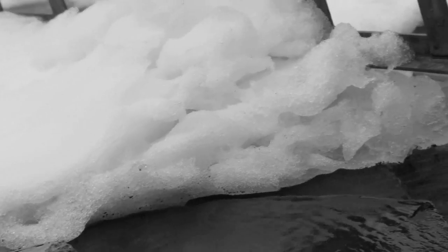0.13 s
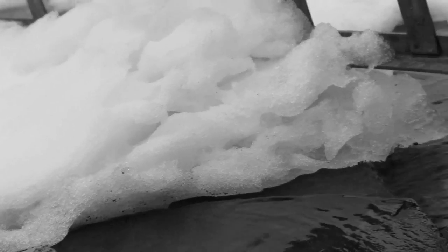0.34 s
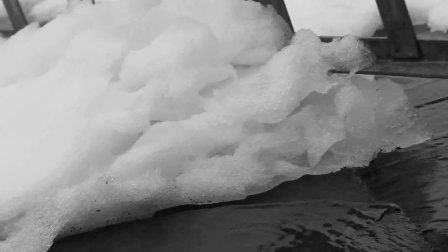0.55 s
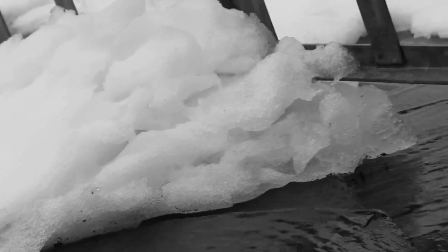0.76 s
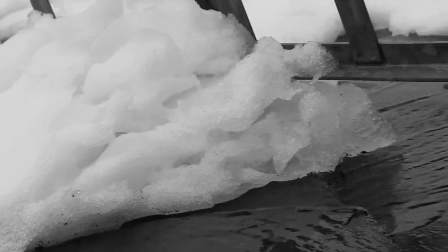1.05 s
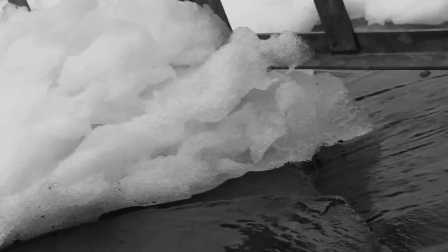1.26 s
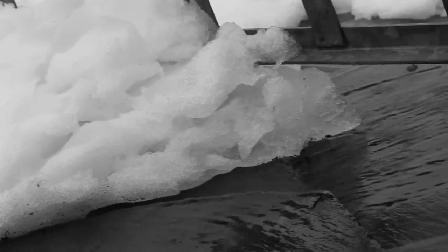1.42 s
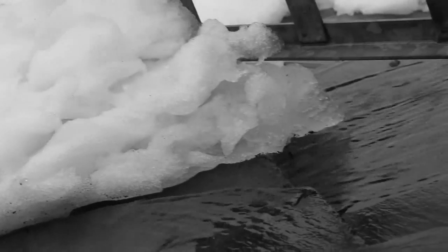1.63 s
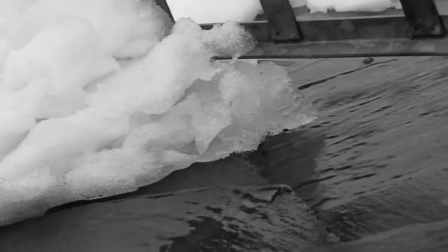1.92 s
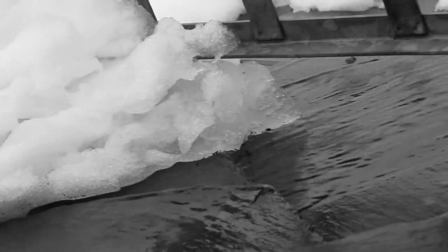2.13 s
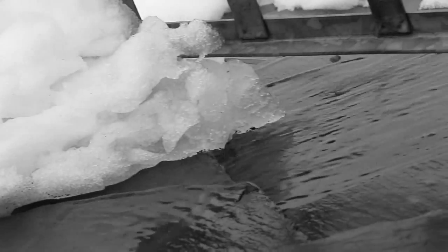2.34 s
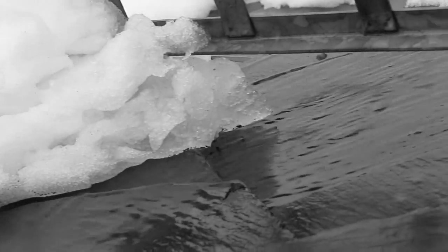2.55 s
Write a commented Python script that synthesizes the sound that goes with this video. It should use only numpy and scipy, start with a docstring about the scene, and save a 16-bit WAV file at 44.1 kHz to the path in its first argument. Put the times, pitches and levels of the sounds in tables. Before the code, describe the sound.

Close, uneven water drips splat and plink on wet wood over a soft distant trickle

```python
"""Meltwater drips from a bank of thawing snow onto wet wooden boards, close to the microphone.
Drops splat as a dead thud, a slap and a puff of spray, or trap a bubble that rings briefly.
Tiny ringing droplets and dry ticks of spatter, placed by chance, fill the gaps.
Diffuse noise tails scatter the water off boards, railing and yard; far off, shaped noise makes
the trickle, faint wind and hiss, and a wavering sine makes a low hum."""
import sys
import numpy as np
from scipy import signal
from scipy.fft import rfft, irfft
from scipy.io import wavfile
from scipy.ndimage import uniform_filter1d

SR = 44100
rng = np.random.default_rng(int(sys.argv[2]) if len(sys.argv) > 2 else 0)


def output_pcm(signal):
    """Save a mono or channel-first signal as 16-bit PCM at the path in sys.argv[1].

    Samples are clipped to [-1, 1] before scaling.
    """
    pcm = np.clip(np.atleast_2d(signal).T, -1, 1) * 32767
    wavfile.write(sys.argv[1], SR, np.round(pcm).astype(np.int16))


N = 118629
T = np.arange(N) / SR
GRAIN_T = np.arange(1600) / SR  # the longest single drop sound
FREQ = np.maximum(np.arange(N // 2 + 1) * SR / N, 1)

# Levels are before reflections and the recorder; pan_db is left minus right.
# Near bubbles that ring: start_s, pitch_hz, peak_db, swell_s, decay_s (time constant), pan_db
RINGING_BUBBLES = [(.1555, 1340, -26.5, .002, .005, -4), (.4, 2400, -31, .001, .003, -2),
                   (.4155, 1890, -29, .004, .005, -1), (.4715, 2080, -20.5, .001, .004, -2),
                   (.4745, 1800, -22, .002, .0025, -1), (.8478, 1770, -23, .0025, .004, -3),
                   (1.077, 3220, -35, .001, .003, -2), (1.1075, 1030, -20, .003, .0038, -1),
                   (1.5325, 1780, -33, .0015, .004, -2), (1.599, 2190, -32, .002, .004, -1),
                   (1.826, 690, -31, .003, .004, 1), (2.111, 1010, -34, .002, .006, -1),
                   (2.2063, 2400, -20.5, .0007, .0024, -1), (2.2105, 3100, -32, .001, .003, -1),
                   (2.2345, 1310, -27.5, .003, .006, -3), (2.249, 1600, -35, .002, .004, -2),
                   (2.3805, 990, -23, .0035, .004, -1), (2.4985, 2500, -34, .001, .003, 0),
                   (2.5677, 1620, -17.5, .0023, .0023, -3), (2.577, 1640, -29, .0015, .002, 0),
                   (1.322, 2400, -36, .002, .003, -1), (.188, 5250, -37, .001, .002, 3),
                   (.348, 6630, -33, .001, .0015, 0), (.36, 4740, -38, .001, .002, 4),
                   (.48, 6350, -30, .001, .0015, -3), (.657, 7080, -32, .001, .0015, -2),
                   (.9203, 5530, -28.5, .0008, .0016, 0), (1, 5490, -32, .001, .0012, 3),
                   (1.078, 6740, -33, .001, .0015, -2), (1.194, 5120, -38, .001, .002, 2),
                   (1.295, 7240, -29, .001, .0015, -3), (1.5335, 4970, -22, .001, .0008, 0),
                   (1.6235, 4420, -29, .0015, .002, 4), (1.956, 5990, -38, .001, .003, 0),
                   (1.979, 6960, -31, .001, .002, -3), (2.057, 5700, -31, .001, .0015, 3),
                   (2.096, 5280, -34, .001, .002, 3), (2.197, 6310, -32, .001, .002, -4),
                   (2.36, 9780, -35, .0005, .0007, 0), (2.4108, 4800, -29, .0008, .0015, -1),
                   (2.537, 4870, -38, .001, .002, -3), (2.598, 6650, -37, .001, .002, 1),
                   (2.658, 6800, -35, .001, .0025, -1), (1.912, 3700, -39, .001, .003, -1)]
# Near drops striking the boards, levels before each part decays (slap and spray as rms):
# start_s, thud_hz, thud_db, slap_db, spray_db, spray_centre_hz, pan_db
BOARD_SPLATS = [(.1558, 1500, -26, -37, -43, 7000, -4), (.2243, 800, -27, -36, -41, 10000, -7),
                (.399, 1500, -28, -46, -44, 6000, -2), (.4715, 1400, -25, -32, -44, 8500, -2),
                (.7842, 850, -13, -29, -27, 7000, -5), (.7852, 2100, -13, -28, -42, 2600, 0),
                (.8472, 1000, -24, -41, -41, 7000, -3), (.949, 1900, -27, -35, -39, 6000, -2),
                (.9535, 1000, -33, -44, -36, 8000, -4), (1.078, 1000, -31, -46, -44, 8000, -2),
                (1.1063, 900, -19, -44, -42, 7500, -2), (1.1066, 1900, -17, -40, -52, 2400, -1),
                (1.3595, 1400, -22, -33, -38, 4000, -5), (1.5003, 1600, -26, -31, -42, 5000, -5),
                (1.5327, 1500, -30, -31, -31.5, 5000, 0), (1.576, 1450, -22.5, -29, -39, 4200, -5),
                (1.599, 1100, -30, -38, -48, 4000, -3), (1.6232, 2200, -38, -46, -33.5, 7000, 3),
                (1.6272, 1400, -21, -31, -32, 4600, -7), (1.7355, 1700, -33, -36, -36, 3700, 0),
                (1.828, 1200, -27, -41, -48, 5000, 0), (1.979, 1500, -38, -48, -36, 11000, -3),
                (2.2066, 1600, -23, -33, -35, 8000, -1), (2.234, 1300, -27, -41, -53, 6000, -3),
                (2.2805, 1500, -24, -41, -36, 5400, -1), (2.379, 1250, -21, -41, -47, 8000, -2),
                (2.4105, 2000, -44, -48, -39, 6000, -1), (2.36, 2000, -46, -50, -39, 9000, 0),
                (2.4455, 2000, -42, -48, -40, 7000, 0), (2.4985, 2000, -37, -41, -41, 4500, 0),
                (2.568, 900, -26, -47, -53, 7000, -3), (.0635, 2000, -44, -48, -39, 12000, -1),
                (.5845, 2000, -44, -48, -40, 12000, 0), (1.2635, 2000, -44, -48, -37, 12000, 1)]
# Unseen droplets in the snow, by size class:
# rate_per_s, lowest_hz, highest_hz, ring_cycles (scaled by chance), size_spread_db, rms_db
SNOW_DROPLETS = [(90, 4300, 8000, 6., 4., -59.5), (200, 7500, 13000, 4., 3.8, -65),
                 (150, 1100, 3500, 3., 2.6, -53.5), (110, 450, 1400, 3., 2.2, -51.5)]
# Relative spectrum of the moving air, low wind and breeze: frequency_hz, level_db (per Hz)
AIR_SPECTRUM = [(13, -16), (24, 0), (40, -5), (58, 0), (75, -4), (100, -6), (140, -7.5), (200, -9.5),
                (255, -10), (305, -7), (345, -11), (385, -10), (450, -16), (580, -30)]
# Relative spectrum of far water and hiss: frequency_hz, level_db (per Hz)
FAR_WATER_SPECTRUM = [(400, 1), (470, 0), (530, 6.5), (600, .5), (800, .5), (1020, 1.5), (1200, -3.5),
                      (1500, 0), (1700, -7.5), (2000, -8.5), (2300, -9.5), (3000, -14.5), (3700, -16.5),
                      (5000, -17.5), (7000, -19.5), (8500, -24), (9500, -23.5), (9950, -18.5),
                      (10500, -23.5), (12500, -23), (14000, -32), (15000, -52)]
# Stereo width of the background: frequency_hz, side_against_mid_db
STEREO_WIDTH = [(28, 9), (60, 3.5), (105, -2), (200, -2), (370, 5), (690, -1), (1270, -6), (2400, -3),
                (4500, -4.5), (8000, -1), (14000, 1)]
# Changes of the low wind: time_s, change_db
WIND_GUSTS = [(0, 0), (.5, 0), (.7, .7), (.9, 0), (1.07, 1.2), (1.3, -1.5), (1.7, -2), (2.69, -.5)]
# Changes of the breeze: time_s, change_db
BREEZE_EASING = [(0, 3), (.5, 2.5), (1, .5), (1.5, 0), (2, -3), (2.69, -2.5)]
# Swells of the far trickle: time_s, change_db
TRICKLE_SWELLS = [(0, 2.5), (.42, 2.3), (.6, -.7), (1.1, -.3), (1.5, .1), (2, -2), (2.69, -3)]
# Distant hum coming and going: time_s, level_db
HUM_LEVELS = [(0, -48), (.24, -36), (.5, -41), (.95, -48), (1.1, -43), (1.3, -46), (1.55, -32), (1.65, -45),
              (1.72, -39), (1.98, -54), (2.25, -41), (2.55, -34), (2.69, -41)]
# Narrow gaps in the recorder's response: centre_hz, width_hz
RECORDER_NOTCHES = [(3940, 280), (7880, 260)]

LAG_S_PER_DB = .000012  # each side's time shift per dB of pan
WIND_DB, BREEZE_DB, FAR_WATER_DB = -33.5, -37.8, -41.7  # before their slow changes
MURMUR_TOP_HZ = 2700  # the far water swells below this; the hiss above does not
HUM_HZ, HUM_WIDTH_HZ, HUM_SIDE = 99.5, 7., .45  # HUM_SIDE is a gain
BUBBLE_RISE_PER_S = 2.  # share of the pitch gained per second
BUBBLE_WOBBLE, WOBBLE_S = .07, .0016  # spread as a share of pitch; time between changes
SPATTER_PER_S, SPATTER_SPREAD_DB, SPATTER_DB = 45, 4., -61.5
THUD_CYCLES = 1.1  # decay time constant in cycles of the thud
SLAP_HZ, SLAP_S = (1600, 2900), .0019  # band of the slapped water film, decay
SPRAY_S, SPRAY_WIDTH = .002, .8  # decay; bandwidth as a share of the centre
THROWN_S, THROWN_HZ = .022, (4500, 11000)  # longest flight, pitch range
THROWN_DB, THROWN_RING_S = -2, .0006  # upper level against the spray, ring decay
SCATTER_T60_S, SCATTER_DB = .035, -10.5  # boards and railing close by
YARD_T60_S, YARD_DB = .25, -19  # the yard further off
TREBLE_HZ, TOP_HZ = 13500, 14800  # the microphone dulls; the recorder cuts


def undb(db):
    """Decibels to gain."""
    return 10 ** (np.asarray(db) / 20)


def level(x, db):
    """Scale to an rms level."""
    return x * undb(db) / np.sqrt(np.mean(x ** 2))


def over_hz(points):
    """Gain at every frequency, from points joined along a log-frequency line."""
    hz, db = np.array(points).T
    return undb(np.interp(np.log(FREQ), np.log(hz), db))


def over_time(points):
    """Decibels at every moment, from (time_s, level_db) points."""
    time_s, db = np.array(points).T
    return np.interp(T, time_s, db)


def walk(rate):
    """Slow chance with a spread near 1: random steps, smoothed."""
    step = int(SR / rate)
    steps = np.repeat(rng.standard_normal(N // step + 1), step)
    return 1.2 * uniform_filter1d(steps, step)[:N]


def noise(gain):
    """Noise of unit rms with the given spectrum."""
    return level(irfft(rfft(rng.standard_normal(N)) * gain, N), 0)


def wide_noise(gain, pan_db):
    """Stereo noise of unit rms whose mid and side balance varies with frequency."""
    width = over_hz(STEREO_WIDTH)
    mid, side = rfft(rng.standard_normal((2, N))) * gain / np.hypot(1, width)
    stereo = irfft(np.array([mid + width * side, mid - width * side]), N)
    pan = undb(np.array([[pan_db], [-pan_db]]) / 2)
    return level(stereo * pan, 0)


def add(out, start, sound, pan_db):
    """Place a sound; it reaches the nearer microphone louder and sooner."""
    for channel, side in enumerate((1, -1)):
        first = max(int((start - side * pan_db * LAG_S_PER_DB) * SR), 0)
        part = sound[:max(N - first, 0)]
        out[channel, first:first + len(part)] += part * undb(side * pan_db / 2)


def moving_air():
    """Low wind with gusts and an easing breeze above it, toward the right: shaped wide noise."""
    air = over_hz(AIR_SPECTRUM) / np.hypot(1, (FREQ / 440) ** 8)
    upper = 1 / np.hypot(1, (210 / FREQ) ** 4)  # the breeze's share
    lower = np.sqrt(1 - upper ** 2)
    wind_db = WIND_DB + over_time(WIND_GUSTS) + .6 * walk(8)
    breeze_db = BREEZE_DB + over_time(BREEZE_EASING)
    wind = wide_noise(air * lower, pan_db=.3) * undb(wind_db)
    breeze = wide_noise(air * upper, pan_db=-4.7) * undb(breeze_db)
    return wind + breeze


def far_water_and_hiss():
    """Far running water murmurs and swells in the lower noise, under a nearly even hiss."""
    spectrum = over_hz(FAR_WATER_SPECTRUM) / np.hypot(1, (420 / FREQ) ** 6)
    bed = wide_noise(spectrum, pan_db=-1.2) * undb(FAR_WATER_DB + .6 * walk(14))
    murmur = irfft(rfft(bed) / (1 + (FREQ / MURMUR_TOP_HZ) ** 8), N)
    hiss = bed - murmur
    return murmur * undb(over_time(TRICKLE_SWELLS)) + hiss


def hum():
    """A distant drone: a sine of drifting pitch, widened by narrow noise opposed left and right."""
    pitch = HUM_HZ + .4 * HUM_WIDTH_HZ * walk(8)
    tone = np.sqrt(2) * np.sin(2 * np.pi * np.cumsum(pitch) / SR)
    side = HUM_SIDE * noise(1 / (1 + ((FREQ - HUM_HZ) / HUM_WIDTH_HZ) ** 2))
    stereo = tone + side * np.array([[1], [-1]])
    return stereo * undb(over_time(HUM_LEVELS))


def bubble(hz, swell, decay, wobble=0):
    """A trapped bubble swells, then dies away while its pitch creeps up, with any wobble given."""
    t = GRAIN_T[:int((swell + 7 * decay) * SR) + 2]
    envelope = np.minimum(t / swell, 1) * np.exp(-np.maximum(t - swell, 0) / decay)
    pitch = hz * (1 + BUBBLE_RISE_PER_S * GRAIN_T + wobble)[:len(t)]
    return envelope * np.sin(2 * np.pi * np.cumsum(pitch) / SR)


def droplets():
    """Small drops in the melting snow: brief bubble rings, many faint and few loud."""
    total = np.zeros((2, N))
    for rate, low, high, cycles, spread, db in SNOW_DROPLETS:
        out = np.zeros((2, N))
        for when, pitch, size, ring, side in rng.random((int(rate * N / SR), 5)):
            hz = low * (high / low) ** pitch
            gain = undb(-spread * np.log(max(size, .02)))
            drop = gain * bubble(hz, swell=1.5 / hz, decay=cycles * (.3 + ring) / hz)
            add(out, when * N / SR, drop, 12 * (side - .55))
        total += level(out, db)
    return total


def spatter():
    """Fine spray lands as dry, broad ticks: quickly dying bursts of banded noise."""
    out = np.zeros((2, N))
    count = int(SPATTER_PER_S * N / SR)
    band = signal.butter(1, (1800, 9000), "band", fs=SR)
    ticks = signal.lfilter(*band, rng.standard_normal((count, 256))) * np.exp(-GRAIN_T[:256] / .0007)
    for (when, size, side), tick in zip(rng.random((count, 3)), ticks):
        gain = undb(-SPATTER_SPREAD_DB * np.log(max(size, .02)))
        add(out, when * N / SR, tick * gain, 12 * (side - .55))
    return level(out, SPATTER_DB)


def noise_burst(band, db, decay):
    """Filtered noise set to an rms level, then made to die away."""
    burst = signal.lfilter(*band, rng.standard_normal(len(GRAIN_T)))
    return level(burst, db) * np.exp(-GRAIN_T / decay)


def splats():
    """Near drops on wet wood: a damped thud, a slap of the water film and a puff of spray."""
    out = np.zeros((2, N))
    film_band = signal.butter(2, SLAP_HZ, "band", fs=SR)
    for start, hz, thud_db, slap_db, spray_db, spray_hz, pan in BOARD_SPLATS:
        thud = -np.sin(2 * np.pi * hz * GRAIN_T) * np.exp(-GRAIN_T * hz / THUD_CYCLES)
        slap = noise_burst(film_band, slap_db, SLAP_S)
        spray_band = signal.iirpeak(spray_hz, 1 / SPRAY_WIDTH, fs=SR)
        spray = noise_burst(spray_band, spray_db, SPRAY_S)
        add(out, start, undb(thud_db) * thud + slap + spray, pan)
        thrown(out, start, spray_db, pan)
    return out


def thrown(out, start, spray_db, pan_db, count=3):
    """Droplets flung from a splat land just after it as tiny rings."""
    low, high = THROWN_HZ
    for flight, pitch, size in rng.random((count, 3)):
        tick = bubble(low * (high / low) ** pitch, THROWN_RING_S / 2, THROWN_RING_S)
        add(out, start + THROWN_S * flight, tick * size * undb(spray_db + THROWN_DB), pan_db)


def bubbles():
    """Near trapped bubbles ring with a pitch that wobbles as their shape changes."""
    out = np.zeros((2, N))
    for start, hz, db, swell, decay, pan in RINGING_BUBBLES:
        shape = rng.standard_normal(len(GRAIN_T))
        wobble = BUBBLE_WOBBLE * np.interp(GRAIN_T / WOBBLE_S, np.arange(len(shape)), shape)
        add(out, start, undb(db) * bubble(hz, swell, decay, wobble), pan)
    return out


def reflections(x, t60, db):
    """A diffuse tail of decaying noise, different on each side, after a 1.5 ms gap."""
    t = T[:SR // 2]
    tail = rng.standard_normal((2, len(t))) * undb(-60 * t / t60) * (t > .0015)
    tail *= undb(db) / np.sqrt(np.sum(tail ** 2, axis=1, keepdims=True))
    return signal.fftconvolve(x, tail, axes=1)[:, :N]


def scene():
    """Water with its near and yard reflections, over the outdoor background."""
    background = moving_air() + far_water_and_hiss() + hum()
    water = droplets() + spatter() + splats() + bubbles()
    scatter = reflections(water, SCATTER_T60_S, SCATTER_DB)
    yard = reflections(water, YARD_T60_S, YARD_DB)
    return background + water + scatter + yard


def record(dry):
    """The microphone dulls the treble; the recorder has two narrow notches and cuts the top."""
    for hz, width in RECORDER_NOTCHES:
        dry = signal.lfilter(*signal.iirnotch(hz, hz / width, fs=SR), dry)
    dry = signal.sosfilt(signal.butter(3, TREBLE_HZ, fs=SR, output="sos"), dry)
    return signal.sosfilt(signal.ellip(8, .2, 70, TOP_HZ, fs=SR, output="sos"), dry)


dry = scene()
out = record(dry)
output_pcm(out)
```